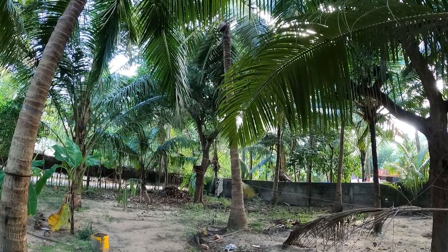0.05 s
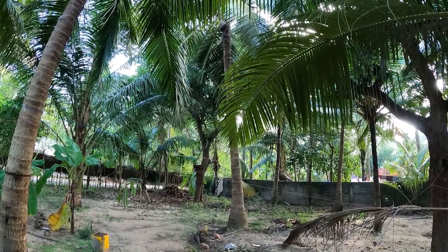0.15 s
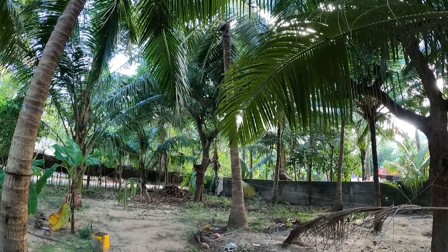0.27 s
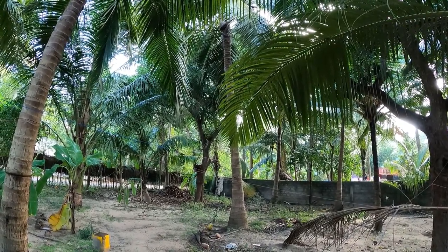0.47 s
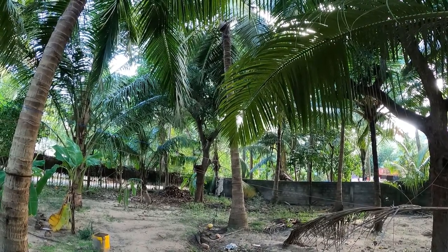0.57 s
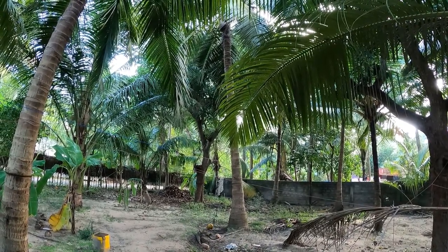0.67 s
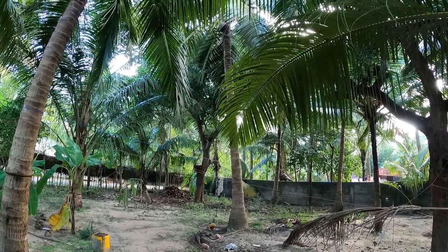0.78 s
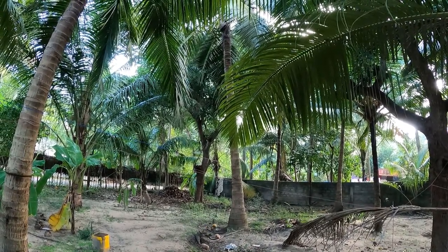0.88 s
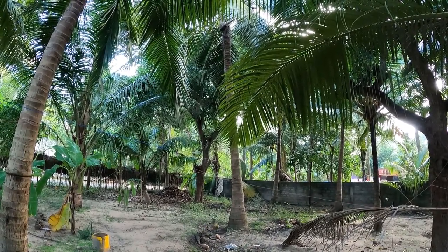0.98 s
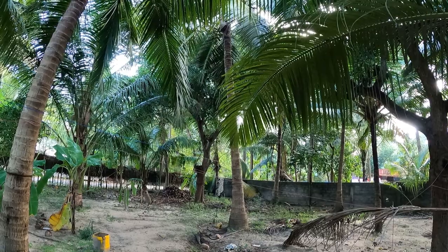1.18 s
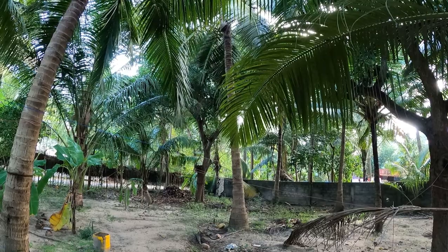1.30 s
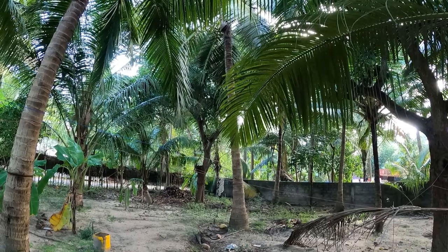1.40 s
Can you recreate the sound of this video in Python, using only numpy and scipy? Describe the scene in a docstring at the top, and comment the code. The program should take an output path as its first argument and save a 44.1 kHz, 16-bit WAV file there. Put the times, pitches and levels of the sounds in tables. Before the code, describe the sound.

Something heavy like a coconut falls in a palm grove. A sharp woody knock and a swish of dry leaves come at about 0.15 seconds, then a heavy thud on soil just after 0.2, echoing briefly. Leaves rustle and twigs tick as things settle, with a small knock near 1.1. Faint insects and a low rumble of air continue throughout, and distant birds call around 0.9 and 1.4.

```python
"""A palm grove, where something heavy like a coconut drops: a sharp woody knock, a swish of dry leaves,
then a thud on soil. The knock is a noise crack over ringing wood; the thud is a damped boom with grit
and a ring of husk. Leaf litter ticks and rustles afterwards, and trunks and a wall scatter the sound.
Behind it, insects buzz in the trees over a low rumble of air, and far birds call faintly."""
import sys
import numpy as np
from scipy import signal
from scipy.fft import rfft, irfft
from scipy.io import wavfile
from scipy.ndimage import uniform_filter1d

SR = 44100
rng = np.random.default_rng(int(sys.argv[2]) if len(sys.argv) > 2 else 0)


def int16_out(signal):
    """Quantize to a 16-bit WAV file."""
    q = np.round(np.clip(np.atleast_2d(signal).T, -1, 1) * 32767)
    wavfile.write(sys.argv[1], SR, q.astype(np.int16))


N = 63945
T = np.arange(N) / SR


def amp(db):
    """Decibels to gain."""
    return 10 ** (np.asarray(db) / 20)


def unit(x):
    """Scales to rms 1."""
    return x / np.sqrt(np.mean(x ** 2) + 1e-20)


def read(points, hz):
    """Reads a spectrum on a log-frequency axis."""
    freqs, values = np.transpose(points)
    return np.interp(np.log(hz + 1), np.log(freqs), values)


def fader(rows):
    """Gain at every sample, from rows that begin (time [s], level [dB])."""
    times, levels = np.transpose(rows)[:2]
    return amp(np.interp(T, times, levels))


def after(start):
    """Time since start, zero before it."""
    return np.maximum(T - start, 0)


def colour(x, points):
    """Causal EQ with the given spectrum and a power gain of 1."""
    log_gain = np.log(amp(read(points, abs(np.fft.fftfreq(4096, 1 / SR)))))
    minimum_phase = np.exp(np.conj(signal.hilbert(log_gain)))
    taps = np.fft.ifft(minimum_phase).real[:2048]
    return signal.fftconvolve(x, taps / np.linalg.norm(taps))[:N]


def soften(x, hz, order=2):
    """Low-pass filter."""
    return signal.sosfilt(signal.butter(order, min(hz, SR * .45), fs=SR, output="sos"), x)


def resonate(x, hz, width_hz):
    """A steep resonant band around hz."""
    carrier = np.exp(2j * np.pi * np.cumsum(hz * np.ones(N)) / SR)
    return (carrier * soften(x / carrier, width_hz / 2, order=3)).real


def ring(modes, start):
    """Decaying modes (frequency [Hz], level [dB], t60 [s]) struck at start."""
    t = after(start)
    return sum(amp(db - 60 * t / t60) * np.sin(2 * np.pi * hz * t) for hz, db, t60 in modes)


def spread(a, b):
    """Two unrelated sounds become a diffuse stereo pair, nearly mono in the bass."""
    # likeness of left and right (frequency [Hz], correlation [0-1])
    likeness = [(60, 1), (130, 0.98), (280, 0.91), (700, 0.81), (2000, 0.7), (5000, 0.71), (12000, 0.71)]
    same = np.clip(read(likeness, np.fft.rfftfreq(N, 1 / SR)), 0, .9995)
    mid = irfft(rfft(a) * np.sqrt((1 + same) / 2), N)
    side = irfft(rfft(b) * np.sqrt((1 - same) / 2), N)
    return np.array([mid + side, mid - side])


def air():
    """A bed of outdoor air: a soft noise wash over a lumpy low rumble."""
    # tone of the breeze (frequency [Hz], relative level [dB])
    breeze_eq = [(20, -4.5), (35, 1), (55, 3), (78, -6), (110, -2), (200, -13), (300, -20), (600, -23),
                 (850, -29.5), (1300, -28), (2200, -38.5), (4000, -47), (7000, -43.5), (9500, -59.5),
                 (13000, -67), (16000, -84)]
    # level ride on the rumble (time [s], boost [dB])
    rumble_ride = [(0, 3), (.05, 12.5), (.09, -20), (.14, 6.5), (.5, -2.5), (.8, -0.5), (1.03, 2),
                   (1.22, -2.5), (1.4, 8)]
    level_db, swell_db, rumble_hz = -40, 2, 81
    hz, t, spectra = signal.stft(rng.standard_normal((2, N)), SR, nperseg=2048, noverlap=1536)
    patches = uniform_filter1d(rng.standard_normal(spectra.shape[1:]), size=16, axis=0)
    patches_db = unit(uniform_filter1d(patches, size=6, axis=1))
    swell = unit(uniform_filter1d(rng.standard_normal(len(t)), size=8))
    low_end = np.exp(-(hz[:, None] / rumble_hz) ** 2)
    rumble_db = low_end * (swell_db * swell + np.interp(t, *np.transpose(rumble_ride)))
    gain = amp(read(breeze_eq, hz)[:, None] + patches_db + rumble_db)
    wash = signal.istft(spectra * gain, nperseg=2048, noverlap=1536)[1][:, :N]
    return amp(level_db) * spread(*unit(wash))


def insects():
    """One insect pulses through narrow resonances; a smooth far chorus drifts below it in pitch."""
    # level ride on the single insect (time [s], level [dB])
    buzz_ride = [(0, -63.5), (.07, -59.5), (.11, -68), (.4, -77), (.48, -68.5), (.66, -63), (.85, -62),
                 (.9, -66), (1.17, -70), (1.3, -63), (1.45, -60.5)]
    # its resonances (frequency [Hz], width [Hz], relative level [dB])
    buzz_bands = [(7195, 540, 2), (11150, 530, -23), (14950, 450, -37)]
    # noise band of the chorus (time [s], level [dB], centre [Hz], width [Hz])
    chorus_path = [(0, -64.5, 5850, 900), (.12, -65.5, 5740, 900), (.45, -81, 5500, 900),
                   (.68, -73, 5470, 896), (.85, -63, 5850, 1190), (1.05, -62.5, 5720, 1210),
                   (1.2, -64, 5480, 700), (1.33, -64.5, 5820, 550), (1.45, -64.5, 5720, 550)]
    pulse_hz, decay_cycles = 125.5, 0.62
    pulses = np.exp(-(T * pulse_hz % 1) / decay_cycles) * rng.standard_normal((2, N))
    buzz = unit(sum(amp(db) * resonate(pulses, hz, width) for hz, width, db in buzz_bands))
    hz, t, spectra = signal.stft(rng.standard_normal((2, N)), SR, nperseg=512)
    times, _, centre, width = np.transpose(chorus_path)
    centre, width = np.interp(t, times, centre), np.interp(t, times, width)
    band = 1 / np.sqrt(width * (1 + (2 * (hz[:, None] - centre) / width) ** 6))
    chorus = unit(signal.istft(spectra * band, SR, nperseg=512)[1][:, :N])
    return spread(*(fader(buzz_ride) * buzz + fader(chorus_path) * chorus))


def birds():
    """Far birds: hoarse swells of band noise and a single pure peep."""
    # hoarse calls (time [s], length [s], level [dB])
    calls = [(0.941, 0.11, -62.5), (1.39, 0.09, -65.5)]
    peep_s, peep_hz, peep_db, peep_width_s = 1.401, 2214, -53.5, 0.0041
    swells = sum(amp(db) * np.sin(np.pi * np.minimum(after(s) / length, 1)) for s, length, db in calls)
    rasp = unit(resonate(rng.standard_normal(N), hz=2510, width_hz=800))
    peep_envelope = amp(peep_db) * np.exp(-((T - peep_s) / peep_width_s) ** 2)
    return swells * rasp + peep_envelope * np.sin(2 * np.pi * peep_hz * T)


def grove(send):
    """Reverb: sparse reflections from trunks and wall, each band dying at its own speed."""
    # decay of the reflections (frequency [Hz], t60 [s])
    decay = [(60, 0.5), (200, .65), (700, 0.39), (1800, 0.53), (4800, 0.5649), (12000, 0.47)]
    # their tone (frequency [Hz], relative level [dB])
    tail_eq = [(40, -9.5), (160, -6.5), (300, -0.5), (700, -1.5), (1100, 1), (1700, 3.5), (3000, -3),
               (10000, -1.5)]
    echoes_per_s, build_s = 2500, 0.021
    echoes = rng.choice([-1., 1.], (2, N)) * (rng.random((2, N)) < echoes_per_s / SR)
    hz, t, spectra = signal.stft(echoes * np.minimum(T / build_s, 1), SR, nperseg=512)
    gain = amp(read(tail_eq, hz)[:, None] - 60 * t / read(decay, hz)[:, None])
    tail = signal.istft(spectra * gain, SR, nperseg=512)[1]
    wet = signal.fftconvolve(send[None], tail / np.linalg.norm(tail[0]), axes=1)[:, :N]
    return spread(*wet)


def twigs():
    """Twigs tick in the litter, each one a single mode that dies at once."""
    # ticks (time [s], level before the low-pass [dB], pitch [Hz])
    ticks = [(0.215, -27.5, 9200), (.5625, -24, 2530), (.5677, -33.5, 4240), (0.6031, -39.5, 3500),
             (0.733, -47, 7040), (1.171, -39, 3300), (1.409, -44, 10200)]
    t60_s = .0016
    return soften(sum(ring([(hz, db, t60_s)], start) for start, db, hz in ticks), hz=9300)


def leaves():
    """Dry leaves rustle in bursts of tiny snaps, each burst with its own brightness."""
    # bursts (time [s], level before filtering [dB], attack [s], t60 [s], low-pass [Hz])
    rustles = [(.15, -40, 0.0068, 0.17, 9100), (0.178, -39.5, 0.016, 0.23, 15200),
               (0.211, -40.5, 0.0033, 0.091, 14000), (.23, -45.5, 0.011, 0.62, 5800),
               (.513, -50.5, 0.011, 0.17, 4040), (0.541, -54.5, 0.017, 0.3, 16000),
               (.755, -54.5, 0.0077, 0.067, 5000), (1.019, -51.5, 0.02, 0.33, 3120),
               (1.085, -54, 0.019, 0.53, 5600), (1.4, -65, 0.021, .4, 9000)]
    # tone of dry leaves (frequency [Hz], relative level [dB])
    leaf_eq = [(200, -2.5), (800, -4), (1400, 0.5), (2700, -4), (4500, -5), (7000, -10.5), (9000, -17),
               (12000, -22.5), (16000, -44)]
    snaps_per_s, size_spread_db = 2500, 3
    sizes = amp(size_spread_db * np.minimum(rng.exponential(1, N), 4)) * rng.choice([-1, 1], N)
    snaps = unit(sizes * (rng.random(N) < snaps_per_s / SR))
    bursts = np.zeros(N)
    for start, db, attack, t60, cutoff in rustles:
        envelope = amp(db - 60 * after(start + attack) / t60) * np.minimum(after(start) / attack, 1)
        bursts += soften(snaps * envelope, cutoff)
    return colour(bursts, leaf_eq)


def bump():
    """One soft low pulse follows the landing."""
    time_s, level_db, width_s = .2842, -18, 0.0018
    u = (T - time_s) / width_s
    return amp(level_db) * (1 - u ** 2) * np.exp(-u ** 2 / 2)


def knocks():
    """Each knock is a dry crack of noise over the ring of struck wood."""
    # hits on wood (time [s], relative level [dB])
    hits = [(.137, -21.5), (.1448, -22.5), (.148, -26), (0.167, -47), (0.191, -33), (1.08, -36)]
    # modes of the wood (frequency [Hz], relative level [dB], t60 [s])
    wood_modes = [(590, -14, 0.033), (1230, -8.5, 0.24), (1510, -18, 0.057), (1895, -5, 0.067),
                  (2137, -4, 0.09), (2670, -3.5, 0.044), (3423, -3, 0.04), (6980, -8, 0.048)]
    # tone of the crack (frequency [Hz], relative level [dB])
    crack_eq = [(200, -26), (600, -12), (900, -16), (1500, 0.5), (2800, 2.5), (4500, -8.5), (7000, -11),
                (9000, -29), (16000, -53)]
    wood_db, crack_t60_s = -12, 0.03
    track = np.zeros(N)
    for start, db in hits:
        burst = rng.standard_normal(N) * (T >= start) * amp(-60 * after(start) / crack_t60_s)
        wood = amp(wood_db) * soften(ring(wood_modes, start), hz=9300)
        track += amp(db) * (.5 * colour(burst, crack_eq) + wood)
    return track


def thud():
    """The landing: a slap of contact, a damped boom of soil, crushed grit and a brief ring of husk."""
    # modes of the husk (frequency [Hz], level [dB], t60 [s])
    husk_modes = [(284, -34.5, .14), (371, -30.5, 0.105), (464, -30, 0.071), (626, -20, 0.032),
                  (919.5, -31.5, 0.1), (1005.7, -25, 0.072), (1102, -25.5, 0.038), (1200, -26, 0.039),
                  (1350, -27, 0.062), (1749, -29, 0.061), (1920, -30, 0.038), (2830, -36.5, .05)]
    # tone of the crushed grit (frequency [Hz], relative level [dB])
    grit_eq = [(150, 1.5), (500, -1.5), (800, -11), (1200, 4), (1800, -3), (3000, -12.5), (6000, -22),
               (16000, -50)]
    start_s, slap_s, boom_attack_s = .2189, 0.0004, 0.0015
    slap_db, grit_db, grit_t60_s = -5, -22.5, 0.042
    # (frequency [Hz], level [dB], t60 [s])
    soil, ground_shake = (158.8, -2.5, 0.03), (42.3, -25.5, 0.25)
    t = after(start_s)
    u = t / slap_s
    slap = amp(slap_db) * soften((T >= start_s) * (1 - u) * np.exp(-u), hz=990)
    boom = ring([soil, ground_shake], start_s) * (1 - np.exp(-(t / boom_attack_s) ** 2))
    grit = rng.standard_normal(N) * (T >= start_s) * amp(grit_db - 60 * t / grit_t60_s)
    return slap - boom + colour(grit, grit_eq) + ring(husk_modes, start_s)


def scene():
    """The fall and the birds, with their grove reverb, over a bed of air and insects."""
    # (track, reverb send [dB])
    tracks = [(knocks(), -4), (thud() + bump(), -8), (leaves() + birds(), -7.5), (twigs(), -9)]
    direct = sum(track for track, _ in tracks)
    send = sum(amp(db) * track for track, db in tracks)
    return direct + grove(send) + air() + insects()


def record(dry):
    """Makes the left channel slightly louder and slightly later, then cuts the extreme treble."""
    # balance (frequency [Hz], left over right [dB])
    balance = [(100, 0.44), (2000, 0.8), (5000, 0.8), (8000, 1), (14000, 3)]
    # phase between the channels (frequency [Hz], left minus right [rad])
    phase = [(60, -0.012), (200, -0.13), (500, -0.3), (1300, -0.45), (3100, -0.83), (5600, -0.41),
             (8300, -0.64), (15000, -0.82)]
    cutoff_hz = 16400
    hz = np.fft.rfftfreq(N, 1 / SR)
    left_gain = amp(read(balance, hz) / 2) * np.exp(.5j * read(phase, hz))
    placed = irfft(rfft(dry) * np.array([left_gain, 1 / left_gain]), N)
    high_cut = signal.firwin(511, cutoff_hz, window=("kaiser", 9), fs=SR)
    return signal.oaconvolve(placed, high_cut[None], "same")


dry = scene()
out = record(dry)
int16_out(out)
```